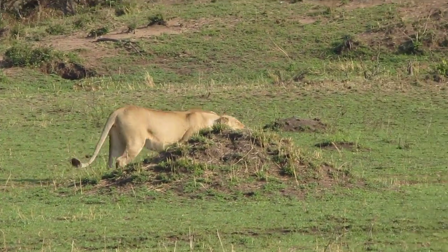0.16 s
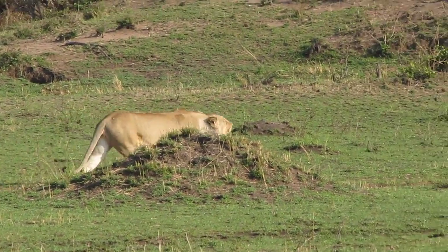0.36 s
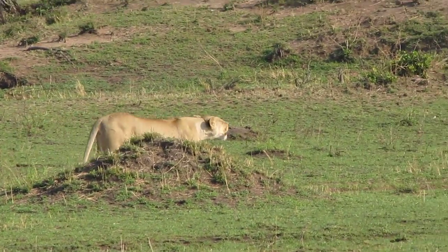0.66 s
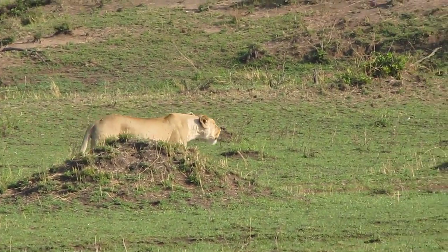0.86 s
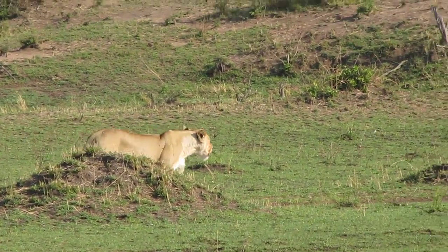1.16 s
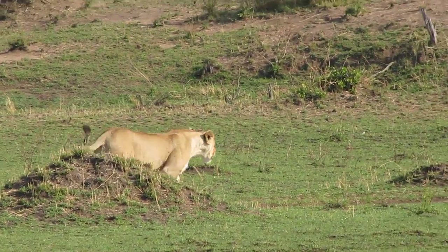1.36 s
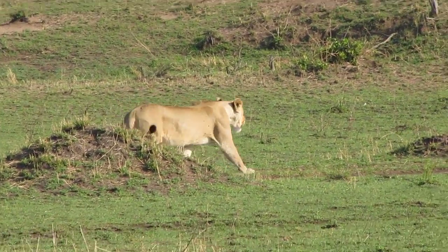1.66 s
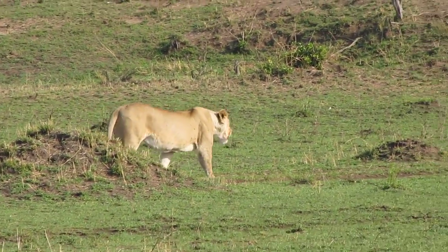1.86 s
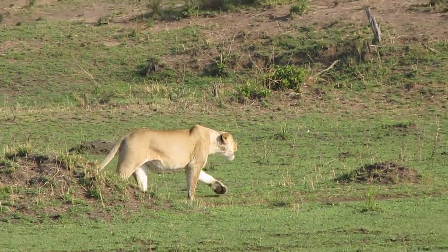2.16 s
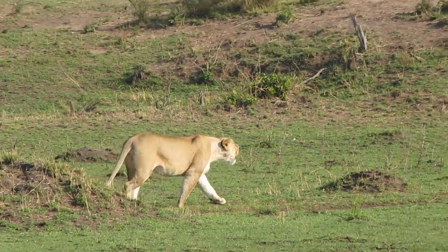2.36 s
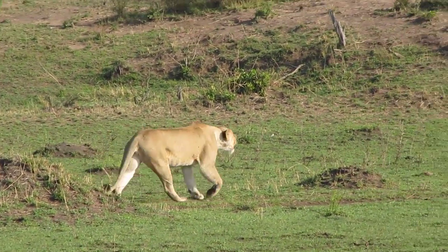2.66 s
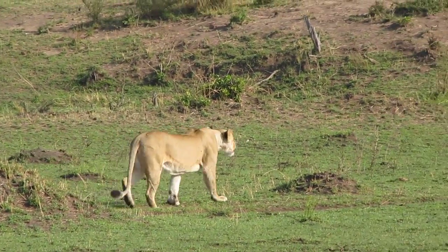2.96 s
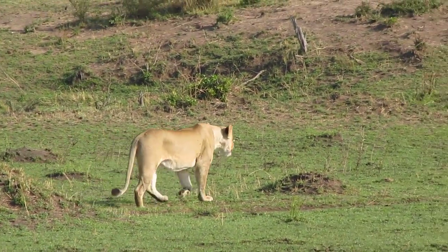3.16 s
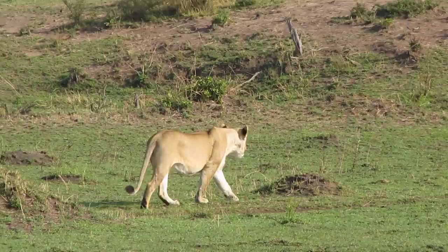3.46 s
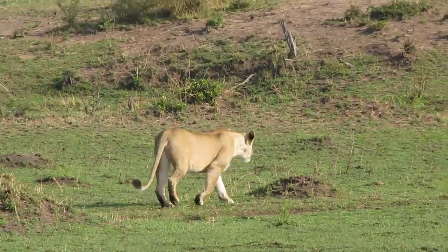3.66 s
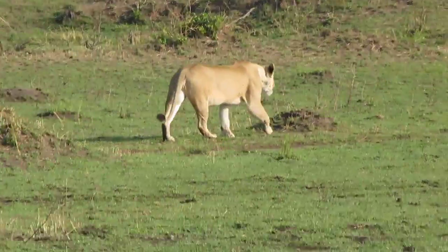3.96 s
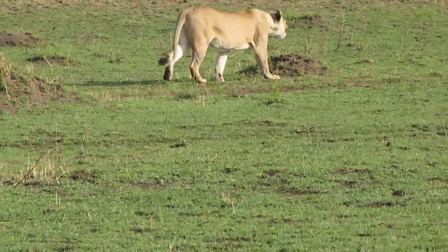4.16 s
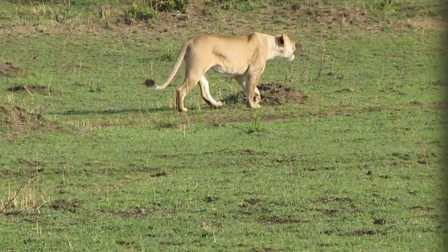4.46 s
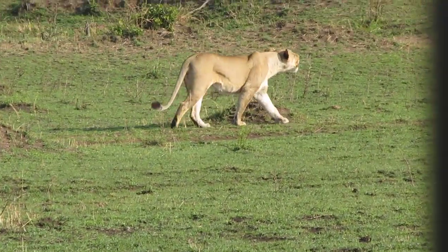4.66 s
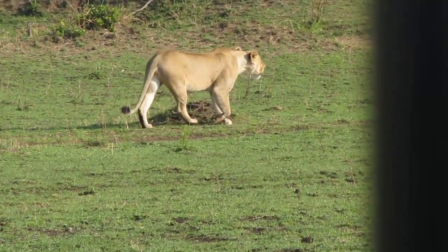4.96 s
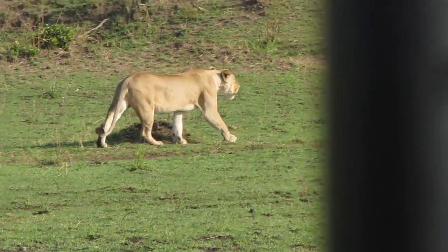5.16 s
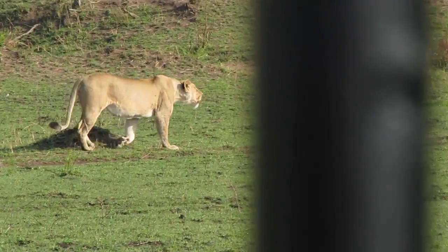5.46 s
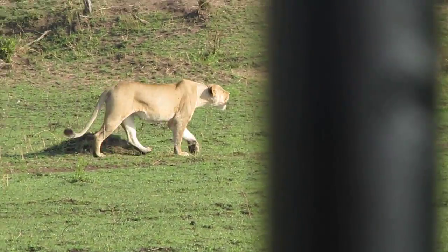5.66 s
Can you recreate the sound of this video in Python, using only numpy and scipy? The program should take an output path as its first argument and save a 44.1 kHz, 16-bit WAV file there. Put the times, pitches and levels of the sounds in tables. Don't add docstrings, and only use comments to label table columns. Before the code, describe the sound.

A lioness gives three spaced hoarse moans on open grassland while heavy wind rumbles in the microphone and small birds squeal, tick and whistle.

```python
import sys
import numpy as np
from scipy import signal
from scipy.fft import rfft, irfft
from scipy.io import wavfile
from scipy.ndimage import uniform_filter1d, minimum_filter1d

SR = 44100
rng = np.random.default_rng(int(sys.argv[2]) if len(sys.argv) > 2 else 0)


def transcribe(u):
    v = np.clip(np.atleast_2d(u).T, -1, 1)
    q = np.round(v * 32767).astype(np.int16)
    wavfile.write(sys.argv[1], SR, q)


def attenuation_scalar(level_db):
    decades = np.asarray(level_db, float) / 20
    return 10 ** decades


N = 256200

# centre in Hz, width in Hz, level in dB.
THROAT = [(443.4, 31, 7.5), (493, 63, 8.5), (756, 61, -1.5), (851.4, 36, -4), (1090, 23, -26.5),
          (1530, 95, -19.5)]
# centre in Hz, width in Hz, level in dB.
CAVITIES = [(1640, 240, -31), (2050, 260, -34), (2550, 220, -32), (3000, 300, -33), (3600, 300, -32),
            (4200, 260, -37), (4850, 260, -37), (5800, 400, -39), (7700, 700, -45)]
# frequency in Hz, level in dB.
EDGE = [(120, -7), (200, 11), (280, 6.5), (400, 0.5), (700, -14), (1200, -40.5), (2500, -69.5)]


def evened(x):
    return x / np.sqrt(np.mean(x ** 2) + 1e-20)


def read(points, hz):
    f, value = np.transpose(points)
    return np.interp(np.log(hz + 1), np.log(f + 1), value)


def add(mix, s, sound, pan_db):
    part = mix[:, round(s * SR):][:, :len(sound)]
    part += attenuation_scalar(np.array([[pan_db / 2], [-pan_db / 2]])) * sound[:part.shape[1]]


def columns(rows):
    s, *rest = np.transpose(rows)
    t = np.arange(s[0], s[-1], 1 / SR)
    return [np.interp(t, s, c) for c in rest]


def drift(n, per_s):
    size = max(int(SR / per_s), 1)
    noise = rng.standard_normal(n + 2 * size)
    smooth = uniform_filter1d(uniform_filter1d(noise, size), size)
    return evened(smooth)[size:size + n]


def colour(x, points):
    gain = attenuation_scalar(read(points, np.fft.rfftfreq(x.shape[-1], 1 / SR)))
    return irfft(rfft(x) * gain, x.shape[-1])


def resonate(x, hz, width):
    b, a = signal.iirpeak(hz, hz / width, SR)
    return signal.lfilter(b, a, signal.lfilter(b, a, x))


def wander(x, hz, width):
    turn, r = np.exp(2j * np.pi * np.cumsum(hz) / SR), np.exp(-np.pi * width / SR)
    return 2 * (turn * signal.lfilter([(1 - r) ** 2], [1, -2 * r, r * r], x / turn)).real


def chest(rows, over_from_db, over_to_db, octave_from_db, octave_to_db, open_db):
    # multiple of the pitch, level in dB.
    partials = [(3, 0), (4, -14), (5, -11), (6, -2), (7, -11), (8, -18), (9, -15), (10, -15), (11, -32)]
    hz, db = columns(rows)
    n = len(hz)
    u = np.linspace(0, 1, n)
    late_db = np.pad(db, (round(.056 * SR), 0), "edge")[:n]
    slack_db = -14 * np.clip(20 * (u - .72), 0, 1)
    over_db = over_from_db + (over_to_db - over_from_db) * u + .67 * db + slack_db
    octave_db = octave_from_db + (octave_to_db - octave_from_db) * u + late_db
    shut_db = -30
    mouth_db = shut_db + (open_db - shut_db) * np.sqrt(abs(np.sin(np.pi * u)))
    lips_hz = np.interp(u, [0, .55], (1430, 1850))
    turns = 2 * np.pi * np.cumsum(hz * (1 + .006 * drift(n, 45))) / SR
    voice = attenuation_scalar(db + .37 * drift(n, 45)) * np.cos(turns)
    voice += attenuation_scalar(octave_db + 4 * drift(n, 70)) * np.cos(2 * turns + 1.2 * drift(n, 50))
    for k, partial_db in partials:
        lips_db = 13 / (1 + ((k * hz - lips_hz) / 110) ** 2)
        waver_db = (1 + k / 3) * drift(n, 24)
        level = attenuation_scalar(over_db + partial_db + mouth_db * (k > 4) + lips_db + waver_db)
        voice += level * np.cos(k * turns + 2 * np.pi * rng.random())
    return np.sqrt(2) * voice * signal.windows.tukey(n, .15)


def throat_gain(hz):
    return sum(attenuation_scalar(db) / (1 + ((hz - f) / w) ** 2) for f, w, db in THROAT + CAVITIES)


def falsetto(hz, db, jitter):
    n = len(hz)
    hz = hz * (1 + jitter * drift(n, 120))
    turns = np.cumsum(hz) / SR
    voice = np.zeros(n)
    for k in range(1, 19):
        level = throat_gain(k * hz) * attenuation_scalar(1.8 * drift(n, 26))
        voice += level * np.cos(2 * np.pi * (k * turns + rng.random()))
    return attenuation_scalar(db - 9) * voice * signal.windows.tukey(n, .2)


def held(rows):
    hz, db = columns(rows)
    past_s = (np.arange(len(hz)) - hz.argmax()) / SR
    return falsetto(hz, db, np.interp(past_s, [0, .05], [.004, .03]))


def crack(length, from_hz, to_hz, db):
    u = np.linspace(0, 1, round(length * SR))
    swell_db = np.interp(u, [0, .6, 1], [-9, 0, -9])
    return falsetto(from_hz + (to_hz - from_hz) * u, db + swell_db, .016)


def rasp(rows):
    # frequency in Hz, level in dB per Hz.
    mouth = [(760, -43), (1300, -5.5), (1670, -9), (2470, -11), (2950, -13), (3300, -10), (4840, -10.5),
             (5900, -14.5), (6700, -21.5), (7700, -23.5), (10000, -37), (13000, -71), (22000, -120)]
    # time in seconds, level in dB.
    breath = [(.15, -71.5), (.4, -71), (.55, -56.5), (.66, -48.5), (.77, -42), (.803, -38), (.82, -43.5),
              (.86, -45.5), (.89, -52.5), (2.3, -61), (2.45, -57), (2.6, -90), (2.72, -49), (2.87, -47.5),
              (2.93, -43), (2.99, -45.5), (3.05, -52), (4.3, -69), (4.57, -68.5), (4.63, -53), (4.73, -52),
              (4.79, -53), (4.83, -45.5), (4.86, -49), (4.89, -48.5), (4.94, -75)]
    db, = columns(rows)
    n = len(db)
    hiss_db = np.interp(rows[0][0] + np.arange(n) / SR, *np.transpose(breath))
    flaps = np.cumsum(70 * np.clip(1.5 + .28 * drift(n, 50), .2, 3)) / SR
    pulse = .35 + np.exp(-(flaps % 1) / .22)
    puffs = pulse * attenuation_scalar(1.5 * drift(n, 30)) * rng.standard_normal(n)
    ring = sum(attenuation_scalar(d) * resonate(puffs, f, 1.09 * w) for f, w, d in THROAT[:4])
    cavity = np.zeros(n)
    for f, w, d in CAVITIES:
        waver = attenuation_scalar(d + 2.5 * drift(n, 40))
        cavity += waver * evened(wander(puffs, f * (1 + .04 * drift(n, 14)), w))
    hiss = evened(evened(colour(puffs, mouth)) + .4 * evened(cavity))
    return (attenuation_scalar(db - 6.5) * evened(ring) + attenuation_scalar(hiss_db) * hiss) * signal.windows.tukey(n, .08)


def lioness(far):
    # time in seconds, pitch in Hz, effort in dB.
    chest_stretches = [
        [(.14, 170.6, -30), (.19, 169.4, -19), (.24, 176.8, -16.5), (.32, 199.4, -15), (.39, 210, -22.5),
         (.45, 194, -39.5)],
        [(.65, 202.8, -21.5), (.69, 204.3, -21.5), (.745, 182.6, -9.5), (.79, 196.6, -26.5), (.87, 175.4, -37)],
        [(2.3, 163.6, -27), (2.42, 184.6, -19.5), (2.49, 213.3, -14.5), (2.53, 224, -39), (2.6, 222, -32)],
        [(2.79, 226.2, -27.5), (2.85, 205.4, -25.5), (2.9, 178.5, -13), (2.95, 199, -23), (3.03, 192, -60)],
        [(4.29, 160, -26), (4.35, 164.3, -19.5), (4.46, 178.4, -15.5), (4.62, 183.3, -14), (4.7, 175.1, -12.5),
         (4.76, 171, -15.5), (4.87, 167.7, -33.5), (4.9, 162, -38)],
    ]
    # overtones at start and end, octave at start and end, widest mouth, all in dB.
    tones = [(-25.5, -41, -23.5, -33, -17.5), (-29, -32, -23, -17, -20), (-49, -20.5, -36.5, -48, -31),
             (-24, -33, -38, -12.5, -12.5), (-31.5, -23, -36.5, -23.5, -15)]
    # time in seconds, pitch in Hz, effort in dB.
    upper = [
        [(.34, 279, -34), (.42, 285.4, -33), (.52, 295.6, -26.5), (.6, 307.6, -26), (.66, 299, -25),
         (.74, 294.5, -24)],
        [(2.49, 291.5, -33), (2.56, 284.2, -32.5), (2.65, 290, -27), (2.73, 312.7, -29), (2.79, 292.5, -25),
         (2.87, 283.4, -30.5)],
    ]
    # start in seconds, length in seconds, from Hz, to Hz, level in dB.
    breaks = [
        (.27, 0.23, 230.2, 256.9, -27.5),
        (.6, 0.19, 257.6, 245, -30.5),
        (2.359, 0.26, 230.2, 265.8, -31),
        (2.72, 0.27, 260.1, 229.2, -31.5),
    ]
    # time in seconds, effort in dB.
    hoarse = [
        [(.15, -38.5), (.17, -34), (.55, -34), (.66, -29.5), (.72, -18.5), (.8, -28), (.86, -36.5), (.92, -37)],
        [(2.3, -56), (2.45, -31.5), (2.6, -53), (2.72, -34.5), (2.8, -31), (2.87, -19), (2.98, -34.5),
         (3.05, -35)],
        [(4.3, -41.5), (4.46, -32.5), (4.58, -49), (4.72, -30), (4.83, -28), (4.89, -37), (4.94, -55)],
    ]
    for rows, tone in zip(chest_stretches, tones):
        add(far, rows[0][0], chest(rows, *tone), .3)
    for s, *glide in breaks:
        add(far, s, crack(*glide), .3)
    for rows in upper:
        add(far, rows[0][0], held(rows), .3)
    for rows in hoarse:
        add(far, rows[0][0], rasp(rows), 1.5)


def squeal(hz, db, rough, odd_db, top_db=0, tilt_db=0, crest_s=0):
    # frequency in Hz, level in dB.
    beak = [(1200, -20), (1900, -13), (2400, -3), (2750, 0), (3300, -1), (3900, -2), (4700, 0),
            (5400, -4.5), (6100, -16), (6700, -5), (7600, -20), (8400, -17), (9200, -28)]
    n = len(hz)
    rough, t = np.clip(rough, 0, 1), np.arange(n) / SR
    jitter = .004 * drift(n, 150) + .11 * rough * drift(n, 700)
    turns = np.cumsum(hz * (1 + jitter)) / SR
    stack = np.zeros(n)
    for k in range(2, 13):
        level_db = read(beak, k * hz) + odd_db * (k % 2) * k / 4 + top_db * (k > 6)
        level_db = level_db + tilt_db * abs(k - 4) + 1.7 * drift(n, 55)
        stack += attenuation_scalar(level_db) * np.cos(2 * np.pi * (k * turns + rng.random()))
    throb = np.cos(2 * np.pi * 47 * (t - crest_s) * (t < crest_s + .3))
    stack *= 1 + np.clip(-odd_db / 17, 0, .65) * throb
    leak = evened(colour(rng.standard_normal(n), beak))
    return attenuation_scalar(db) * (stack + (.3 + rough) * leak) * signal.windows.tukey(n, .1)


def whine(rows):
    hz, db = columns(rows)
    strain = np.clip((db + 53.5) / 4, 0, 1)
    smooth_hz = uniform_filter1d(hz, 900, mode="nearest")
    return squeal(smooth_hz, db, .07 + .2 * strain, -3.5 + 0 * db, -9, -5 * strain)


def squawk(start, clears, crest, crest_hz, db):
    fall_s, rough_db = .034, -53.5
    t = np.arange(start, crest + fall_s, 1 / SR)
    clear = np.clip((t - clears) / .03 + .5, 0, 1)
    sag = np.maximum(t - crest, 0) / fall_s
    throb = np.clip(2 + 2 * (t - crest) / .06, 0, 1)
    hz = crest_hz - 520 * np.maximum(crest - t, 0) - 105 * sag ** 1.5
    level_db = np.interp(t, [start, start + .025, clears, crest], [rough_db - 5, rough_db, rough_db + 2, db])
    rough = .75 - clear * (.56 + .11 * throb) + .15 * sag
    odd_db = -12 * (.1 + clear * (.35 + .55 * throb))
    return squeal(hz, level_db - 20 * sag ** 2, rough, odd_db, 1, -.5, crest - start)


def squealing_bird(far):
    # time in seconds, pitch in Hz, level in dB.
    whines = [
        [(.845, 735, -58), (.9, 772, -53), (.97, 795, -53.5), (1.04, 828, -54)],
        [(2.49, 685, -62), (2.53, 702, -58), (2.57, 742, -54), (2.65, 770, -53.5), (2.72, 756, -53)],
        [(3.02, 755, -53), (3.07, 785, -51), (3.13, 812, -49.5), (3.2, 855, -47.5)],
        [(4.89, 640, -62), (4.96, 695, -58), (5.03, 762, -57), (5.09, 825, -58)],
    ]
    # start, clearing and crest in seconds, crest pitch in Hz, level in dB.
    squawks = [
        (1.025, 1.1, 1.136, 680, -43.5),
        (2.71, 2.785, 2.82, 670, -47),
        (5.055, 5.09, 5.205, 698, -42),
    ]
    for rows in whines:
        add(far, rows[0][0], whine(rows), 2.8)
    for call in squawks:
        add(far, call[0], squawk(*call), 2.8)


def snap(hz, db, cycles, tail_db):
    u = np.arange(600) / SR
    body = np.sin(2 * np.pi * hz * u) * (u * hz / cycles) * np.exp(1 - u * hz / cycles)
    tail = attenuation_scalar(tail_db) * rng.standard_normal(600) * np.exp(-u / .022)
    return attenuation_scalar(db) * (body + np.convolve(tail, body[:40])[:600])


def ticking_bird(far):
    # time in seconds, peak in dB.
    ticks = [(2.203, -46), (2.252, -42), (2.301, -42), (2.346, -41), (2.392, -52), (2.937, -44),
             (2.985, -45), (3.02, -46), (3.062, -38), (3.103, -46), (3.144, -44), (3.185, -40),
             (3.228, -41), (3.27, -40), (3.311, -40), (3.354, -41), (3.398, -42), (3.44, -43), (3.482, -44),
             (3.525, -43), (3.567, -43), (3.608, -42), (3.629, -41), (3.65, -43), (3.692, -48)]
    for s, db in ticks:
        hz = 2800 - 1000 * max(s - 3.3, 0)
        add(far, s + .0003, snap(hz, db + 5.5, .62, -30), 2.8)


def whistle(length, hz0, hz1, db):
    hz = np.linspace(hz0, hz1, int(length * SR))
    hz = hz * (1 + .022 * drift(len(hz), 500))
    level = attenuation_scalar(db + .5 + 3.8 * drift(len(hz), 160))
    return level * np.cos(2 * np.pi * np.cumsum(hz) / SR) * signal.windows.tukey(len(hz), .5)


def whistler(far):
    # start in seconds, slide in Hz, level in dB.
    pips = [(.492, 10, -55), (1.265, -30, -62), (1.52, -150, -62), (1.668, -110, -58), (2.02, -150, -59),
            (3.217, 250, -62), (3.395, -60, -61), (3.532, 150, -55), (3.738, -100, -61), (3.891, 100, -59),
            (4.073, 70, -52), (4.437, -100, -54)]
    # start in seconds, level in dB.
    flicks = [(2.464, -59), (3.567, -52), (3.878, -57), (4.236, -56)]
    # start in seconds, length in seconds, start in Hz, end in Hz, level in dB.
    other_notes = [(2.332, .21, 3610, 3480, -60), (2.507, .067, 3470, 3750, -61),
                   (2.35, .11, 5050, 5100, -63), (3.448, .005, 4500, 5000, -59),
                   (3.459, .006, 4200, 5000, -56), (3.495, .006, 4800, 5300, -58),
                   (3.58, .016, 4550, 4750, -56)]
    notes = [(s, .048, 3800 - slide / 2, 3800 + slide / 2, db) for s, slide, db in pips]
    notes += [(s, .023, 3100, 4650, db) for s, db in flicks]
    for s, *note in notes + other_notes:
        add(far, s, whistle(*note), 2.5)


def plain(x):
    t = np.arange(6000) / SR
    sparse = rng.random((2, 6000)) < .04
    taps = rng.standard_normal((2, 6000)) * sparse * attenuation_scalar(-60 * t / .11) * (t > .004)
    return signal.fftconvolve(x, taps / np.linalg.norm(taps, axis=1)[:, None], axes=1)[:, :N]


def across_ports(far):
    # frequency in Hz, lead of the left in radians.
    port_phase = [(100, 0), (500, -.12), (1000, -.25), (2000, -.52), (3500, -1.05), (5000, -1.7),
                  (7000, -2), (22050, 0)]
    lead = read(port_phase, np.fft.rfftfreq(N, 1 / SR)) * np.array([[1], [0]])
    return irfft(rfft(far) * np.exp(1j * lead), N)


def wind():
    # time in seconds, gust level in dB.
    gusts = [(0.0, -31.5), (.08, -27), (.27, -30.5), (0.342, -21), (.7, -25.5), (1.101, -24.5), (1.4, -27),
             (1.7, -21.5), (2.0, -25.5), (2.25, -21), (3.1, -23.5), (3.6, -19), (4.12, -22), (4.9, -24),
             (5.26, -37), (5.338, -21), (5.579, -31), (5.81, -28)]
    # frequency in Hz, level in dB per Hz.
    rumble = [(8.8, -40.5), (15, 4), (32, -1.5), (50, 6.5), (123, -0.5), (156, -4.5), (260, -24),
              (340, -39), (570, -120)]
    gust_db = np.interp(np.arange(N) / SR, *np.transpose(gusts))
    pan_db = 9 + 4.5 * drift(N, 4)
    edge_db = -40 + gust_db - gust_db.mean()
    shared, lumps = rng.standard_normal(N), drift(N, 25)
    ports = []
    for side in (1, -1):
        lump = .5 * lumps + .73 * drift(N, 25)
        air = (.81 * shared + rng.standard_normal(N)) * attenuation_scalar(4.4 * lump)
        low, edge = evened(colour(air, rumble)), evened(colour(air, EDGE))
        ports.append(attenuation_scalar(gust_db + 1 + side * pan_db / 2) * low + attenuation_scalar(edge_db + side * 3) * edge)
    return np.array(ports)


def buffet(hz, db):
    u = np.arange(2200) / SR
    shape = (u / .007) ** 2 * np.exp(2 - 2 * u / .007)
    ragged = evened(colour(rng.standard_normal(2200), EDGE))
    return attenuation_scalar(db - 6.5) * shape * (np.sin(2 * np.pi * hz * u) + .26 * ragged)


def buffets(near):
    # time in seconds, peak in dB, pitch in Hz, left minus right in dB.
    thumps = [(0.793, -4, 165, 4), (0.883, -19, 109, 0), (1.141, -17.5, 189.2, 20), (1.341, -20, 90, 1),
              (1.371, -13.5, 97, 16), (1.617, -18.5, 144, -4), (1.891, -13.5, 168, 6), (2.1, -13, 80, -4),
              (3.156, -8.5, 78, 15), (3.546, -21, 151, 13), (3.656, -10.5, 148, 15), (3.81, -11, 82, 8.5),
              (3.899, -8, 83, 12), (3.956, -10, 125, 19.5), (4.186, -10, 109, 18), (4.233, -5.5, 112, 5),
              (4.247, -18, 77.5, 26.5), (4.415, -10.5, 181, 14), (4.94, -14.5, 168, 13),
              (5.346, -10, 77.5, 12), (5.489, -12.5, 88, 7)]
    for s, db, hz, pan_db in thumps:
        add(near, s - .004, buffet(hz, db), pan_db)


def slaps(near):
    # time in seconds, peak in dB, left minus right in dB.
    hits = [(0.163, -48, 2), (0.964, -30.5, -10), (1.102, -31.5, -9), (1.324, -35, -11), (2.165, -38, -4),
            (3.607, -32.5, -7), (3.69, -32, 3), (3.902, -35, -6), (4.316, -47.5, 2), (4.868, -47, -1)]
    # frequency in Hz, level in dB.
    dull = [(1500, 0), (3500, -12), (8000, -40)]
    for s, db, pan_db in hits:
        add(near, s, colour(snap(714, db - 7.5, .96, -13), dull), pan_db)


def housing_clicks(near):
    # time in seconds, peak in dB, left minus right in dB.
    clicks = [(0.1713, -46, 17), (0.395, -46, -3), (1.3486, -44, -6.5), (1.473, -42.5, -4),
              (1.6984, -59, 8), (1.734, -42, 3), (2.4328, -45.5, 4.5), (3.2157, -30.5, 30.5),
              (3.345, -43, -4), (3.521, -43, -11), (3.564, -51.5, -17), (3.5698, -46.5, -9),
              (3.619, -44, -2.5), (3.6285, -37.5, -9.5), (3.757, -46, -10.5), (3.891, -39, -8),
              (3.959, -52.5, -8), (5.496, -44.5, -3), (5.72, -51, 1)]
    # frequency in Hz, level in dB.
    thin = [(1000, -30), (2200, -14), (3600, -1), (6500, -3), (10000, 3), (16000, 4)]
    lead_s = .003
    for s, db, pan_db in clicks:
        click = np.pad(snap(6500, db + 4, .3, -52), round(lead_s * SR))
        add(near, s - lead_s + .0017, colour(click, thin), pan_db)


def wash():
    # frequency in Hz, level in dB per Hz.
    air_tone = [(150, -41.5), (250, 1), (341, -14.5), (442, 0), (499, -7), (625, -2), (705, -8), (898, -10),
                (1120, -5), (1250, -13), (1510, -16.5), (2170, -17), (2960, -21), (7930, -30.5),
                (15600, -40)]
    # frequency in Hz, drift in dB.
    patchy = [(1000, 2), (4000, 1.4), (8000, .7)]
    # frequency in Hz, left-right likeness from -1 to 1.
    likeness = [(60, 0.34), (180, -0.18), (550, -0.27), (1650, -0.23), (4970, 0.068), (15000, 0.017)]
    # centre in Hz, width in Hz, level in dB.
    drones = [(617, 78, -53), (768, 160, -57), (1127, 68, -64), (1364, 93, -65)]
    frames, hz = N // 256 + 5, np.fft.rfftfreq(1024, 1 / SR)
    a, b, c, d, patches = rng.standard_normal((frames, 513, 5)).T
    patches = evened(uniform_filter1d(uniform_filter1d(patches, 14, 0), 10, 1))
    same, left = np.clip(read(likeness, hz), -1, 1)[:, None], a + 1j * b
    z = np.array([left, same * left + np.sqrt(1 - same ** 2) * (c + 1j * d)])
    z *= attenuation_scalar(read(air_tone, hz)[:, None] + read(patchy, hz)[:, None] * patches)
    air = attenuation_scalar(-47.5) * evened(signal.istft(z, nperseg=1024, noverlap=768)[1][:, :N])
    hum = np.zeros(N)
    for f, w, db in drones:
        hum += attenuation_scalar(db + 2.6 * drift(N, 4.2)) * evened(resonate(rng.standard_normal(N), f, w))
    return air + hum * attenuation_scalar(np.array([[-1.5], [1.5]]))


def scene():
    far = np.zeros((2, N))
    lioness(far)
    squealing_bird(far)
    ticking_bird(far)
    whistler(far)
    far = far + attenuation_scalar(-15) * plain(far)
    near = wind() + wash()
    buffets(near)
    slaps(near)
    housing_clicks(near)
    return across_ports(far) + near


def top_cut(x):
    return signal.sosfilt(signal.butter(12, 15820, fs=SR, output="sos"), x)


def record(dry):
    room = minimum_filter1d(np.minimum(.89 / (abs(dry).max(0) + 1e-9), 1), 801)
    limited = dry * uniform_filter1d(uniform_filter1d(room, 400), 400)
    top_edge = signal.firwin(801, 15750, window=("kaiser", 9), fs=SR)
    padded = np.pad(limited, ((0, 0), (400, 400)), "reflect")
    return top_cut(signal.oaconvolve(padded, top_edge[None], "valid"))


dry = scene()
out = record(dry)
transcribe(out)
```